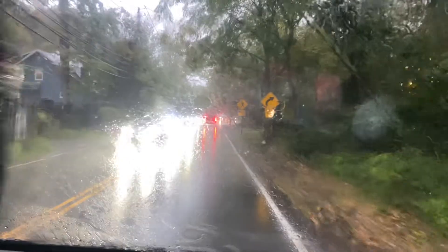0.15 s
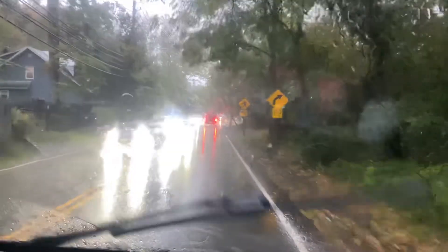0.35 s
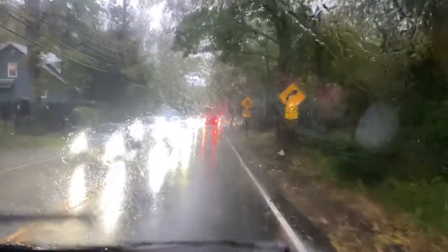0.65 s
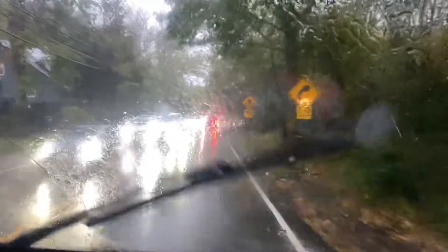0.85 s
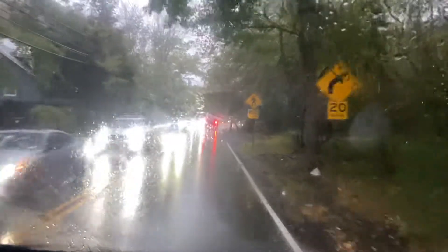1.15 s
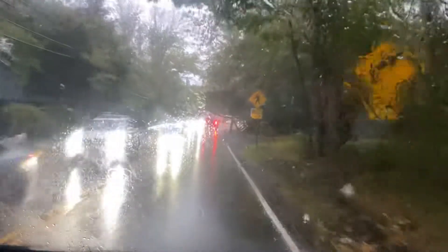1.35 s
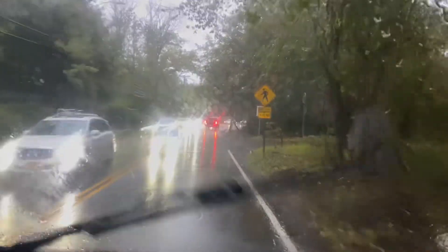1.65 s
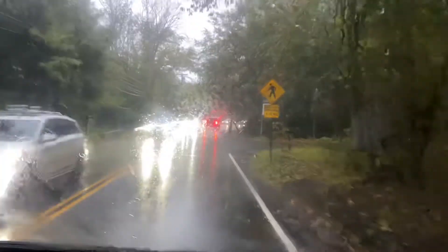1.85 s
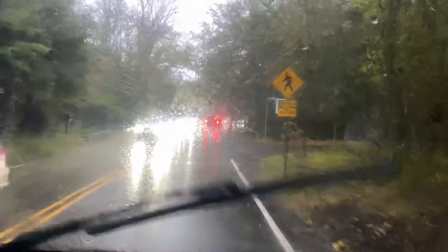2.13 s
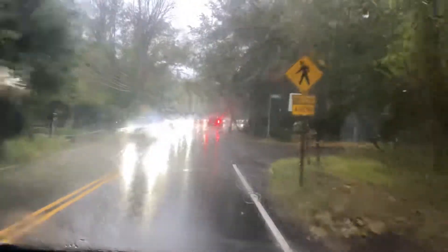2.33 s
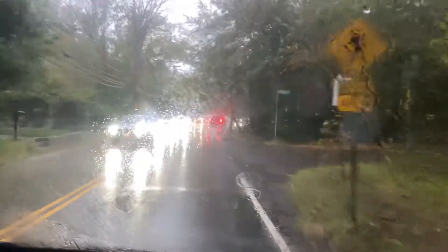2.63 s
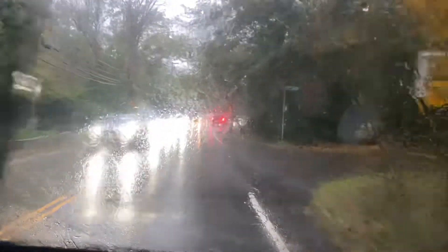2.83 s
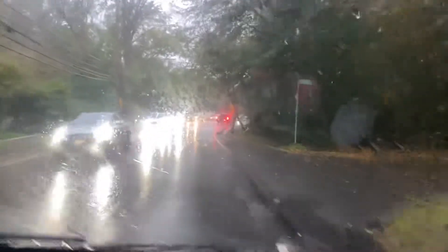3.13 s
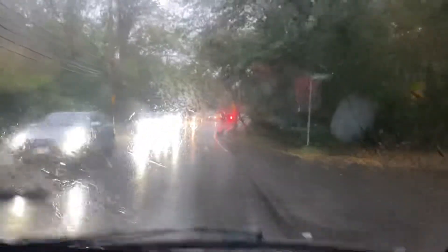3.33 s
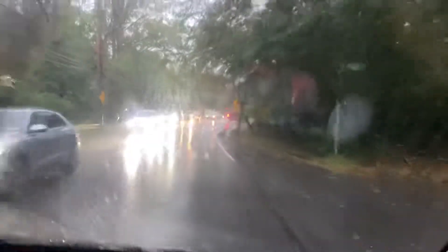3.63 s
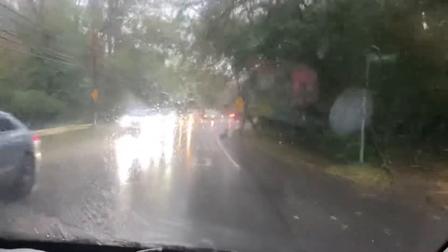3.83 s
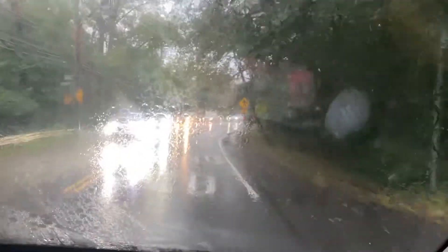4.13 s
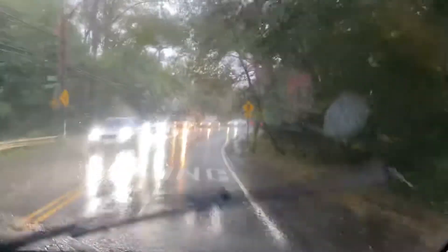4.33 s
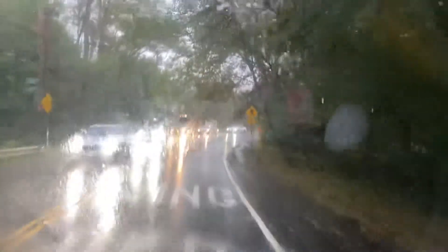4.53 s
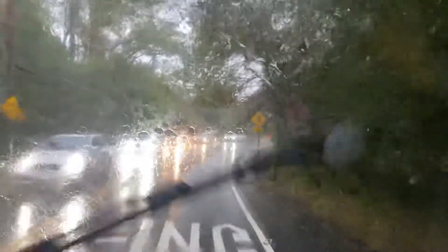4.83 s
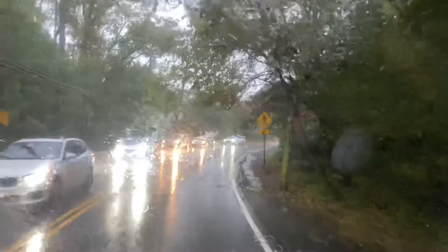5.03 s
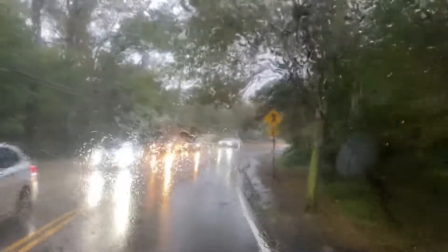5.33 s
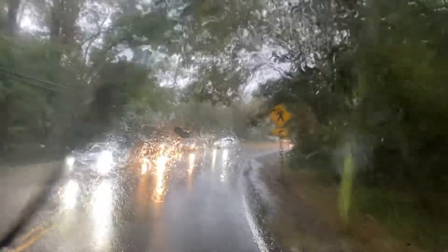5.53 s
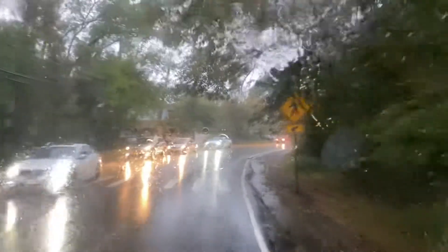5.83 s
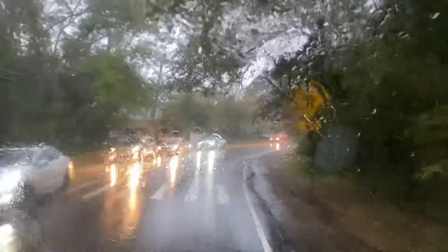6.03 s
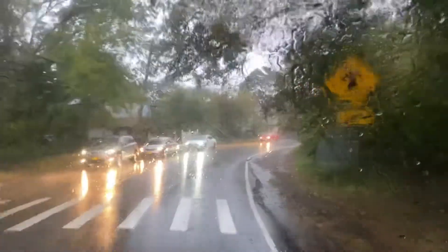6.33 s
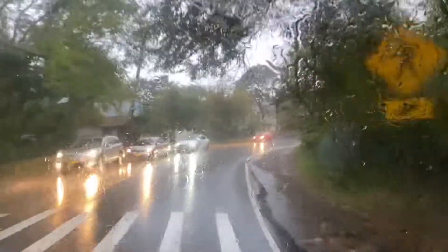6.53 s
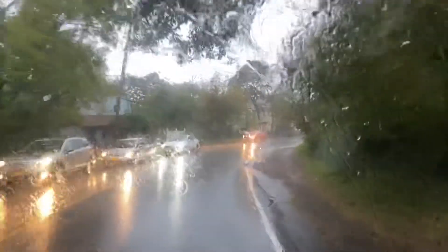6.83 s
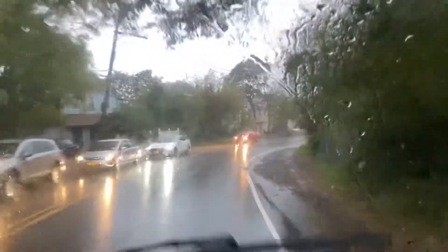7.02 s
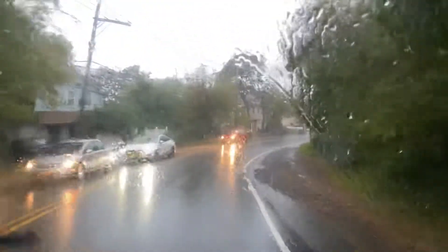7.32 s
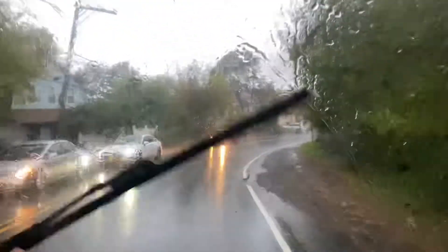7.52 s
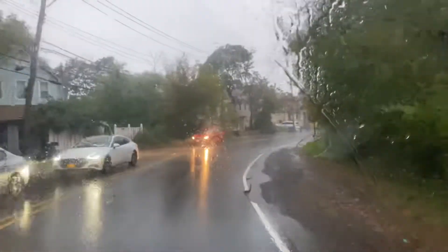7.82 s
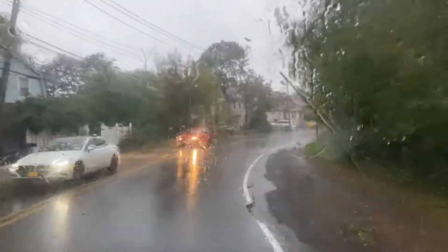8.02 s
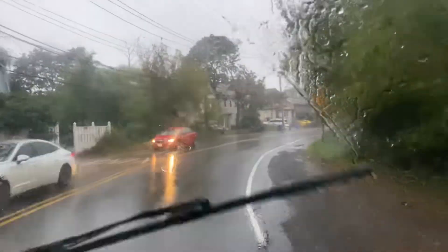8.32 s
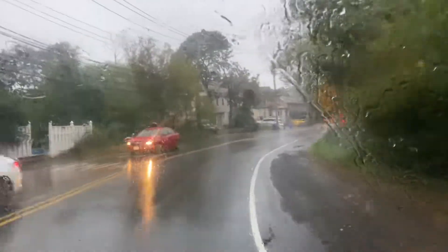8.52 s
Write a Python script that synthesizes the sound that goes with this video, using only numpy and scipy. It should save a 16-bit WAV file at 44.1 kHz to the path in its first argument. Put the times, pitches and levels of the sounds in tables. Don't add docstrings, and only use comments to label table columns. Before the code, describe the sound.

Heard from inside a closed car on a wet road: a deep, uneven road rumble with bumps, steady fine rain hiss, and soft wiper thumps about every two thirds of a second. After one second big drops crack and splatter on glass and roof. A bump past three seconds makes loose metal clink faintly; drops thin, then return heavily after five seconds. Close stereo cabin microphone, brighter on the left.

```python
import sys
import numpy as np
from scipy import signal
from scipy.fft import rfft, irfft, next_fast_len
from scipy.io import wavfile
from scipy.ndimage import uniform_filter1d

SR = 44100
rng = np.random.default_rng(int(sys.argv[2]) if len(sys.argv) > 2 else 0)


def output_pcm(signal):
    pcm = np.clip(np.atleast_2d(signal).T, -1, 1) * 32767
    wavfile.write(sys.argv[1], SR, np.round(pcm).astype(np.int16))


def linear_from_db(decibels):
    return 10 ** (np.asarray(decibels, float) / 20)


N = 382347


def rms_one(x):
    return x / np.sqrt(np.mean(x ** 2) + 1e-20)


def in_time(rows):
    s, *columns = np.transpose(rows)
    return [np.interp(np.arange(N) / SR, s, c) for c in columns]


def at_hz(points, hz):
    table = np.array(points)
    return np.interp(np.log(hz), np.log(table[:, 0]), table[:, 1])


def drift(rate):
    r = np.exp(-80 * np.pi * rate / SR)
    slow = signal.lfilter([1], [1, -2 * r, r * r], rng.standard_normal(N // 40 + 2002))[2000:]
    return np.interp(np.arange(N) / 40, np.arange(len(slow)), rms_one(slow))


def noise():
    return rng.standard_normal((2, N))


def spectrum_bins():
    size = next_fast_len(N + 4096)
    return size, np.maximum(np.arange(size // 2 + 1) * SR / size, 1)


def coloured(spectrum, x):
    size, hz = spectrum_bins()
    return irfft(rfft(x, size) * linear_from_db(at_hz(spectrum, hz)), size)[:, :N]


def band(x, low_hz, high_hz, order=2):
    return signal.sosfilt(signal.butter(order, [low_hz, high_hz], "band", fs=SR, output="sos"), x)


def fade(power, t60):
    return signal.lfilter([1], [1, -linear_from_db(-120 / (t60 * SR))], power + 1e-18)


def smear(power, rise_s):
    r = np.exp(-1 / (rise_s * SR))
    return signal.lfilter([1 - r], [1, -r], power + 1e-18)


def even(x, span_s):
    power = uniform_filter1d(np.mean(x ** 2, axis=0), int(span_s * SR))
    return rms_one(x / np.sqrt(power + 1e-12))


# (time [s], cabin boom [dB], suspension heave [dB], length [s])
LOW_SWELLS = [(0.0, -14.5, -47, 0.022), (0.8, -28, -44, 0.22), (1.104, -23.5, -40, 0.067),
              (1.342, -17, -43, 0.047), (1.935, -20.5, -32, 0.11), (2.653, -17.5, -47, 0.12),
              (3.432, -18.5, -19, 0.1), (3.836, -45, -18, 0.12), (3.966, -12, -38, 0.064),
              (4.87, -13.5, -30, 0.061), (5.315, -18.5, -45, 0.051), (5.5, -20.5, -39, 0.026),
              (5.8, -22.5, -30, 0.12), (6.207, -22, -23.5, 0.11), (6.673, -15, -22, 0.056),
              (6.962, -14, -22, 0.035), (7.43, -28, -38, 0.43), (7.613, -15.5, -43, 0.047),
              (7.71, -14, -28, 0.021), (7.99, -17, -45, 0.063), (8.2, -35, -34, 0.066),
              (8.417, -23.5, -43, 0.11)]


def low_swells():
    t = np.arange(0, N, 64) / SR
    s, boom_db, heave_db, length_s = np.transpose(LOW_SWELLS)[:, :, None]
    side_s = length_s * np.where(t < s, 0.68, 1)
    swell = np.exp(-2 * np.abs(t - s) / side_s)
    powers = [np.sum(linear_from_db(2 * db) * swell, axis=0) for db in (boom_db, heave_db)]
    return [np.interp(np.arange(N) / SR, t, power) for power in powers]


# (time [s], level [dB])
SURFACE = [
    (0, -30.5),
    (1.3, -29.5),
    (2.2, -29),
    (3.0, -31.5),
    (3.4, -28),
    (4.5, -31),
    (6.4, -28),
    (8.0, -28.5),
    (8.67, -29),
]
# (frequency [Hz], density [dB per Hz])
HEAVE = [(12, -34), (25, -4), (33, 8.5), (40, 2), (52, 13.5), (65, -22), (90, -83)]
# (frequency [Hz], density [dB per Hz])
BOOM = [(15, -30), (45, -14), (62, 8), (75, 12), (90, 6), (105, -5), (140, -51.5)]
# (frequency [Hz], width [Hz], level [dB])
CABIN = [(119.4, 17.2, 2.5), (145.5, 29.5, -3.5), (188.7, 23.7, -7.5), (247.4, 23.4, -8),
         (300.3, 24.8, -5.5), (542.6, 39, -17.5), (655, 160, -22.5)]


def road():
    (drone_db,) = in_time(SURFACE)
    boom_power, heave_power = low_swells()
    heave = np.sqrt(linear_from_db(2 * (drone_db - 7.5)) + heave_power)
    boom = np.sqrt(linear_from_db(2 * (drone_db + 1.5)) + boom_power)
    white, drone = noise(), 0
    for k, (hz, width_hz, level_db) in enumerate(CABIN):
        r = np.exp(-np.pi * width_hz / SR)
        numerator = [(1 - r * r) / 2, 0, (r * r - 1) / 2]
        denominator = [1, -2 * r * np.cos(2 * np.pi * hz / SR), r * r]
        ringing = signal.lfilter(numerator, denominator, white)
        drone = drone + (-1) ** k * linear_from_db(level_db + 1.68 * drift(3.9)) * ringing
    low = heave * even(coloured(HEAVE, noise()), 1.0) + boom * even(coloured(BOOM, noise()), 0.26)
    return low + linear_from_db(drone_db) * rms_one(drone)


# (time [s], level [dB])
RAINFALL = [
    (0, -41.5),
    (1.0, -41),
    (2.8, -41.5),
    (3.7, -39),
    (5.2, -39.5),
    (5.36, -43.5),
    (7.4, -39.5),
    (8.3, -39.5),
    (8.67, -38),
]
# (time [s], level [dB])
CANOPY = [(0.93, -45.5), (1.02, -33), (1.35, -32.5), (1.55, -43), (2.2, -33.5), (2.7, -30), (2.95, -40.5),
          (3.3, -40.5), (4.2, -43.5), (5.25, -41.5), (5.45, -61.5), (5.96, -28), (6.3, -45), (6.6, -27),
          (7.1, -44.5), (7.98, -32), (8.15, -45), (8.67, -45)]
# (frequency [Hz], density [dB per Hz])
FINE = [(590, -18), (1000, -8.5), (1270, 3.5), (1460, -1.5), (2170, -1), (2350, 2), (4370, -4.5),
        (6590, -11.5), (8220, -13), (9850, -9.5), (11000, -14), (16000, -8)]
# (frequency [Hz], density [dB per Hz])
ROOF = [(190, -82), (330, -6.5), (452, -6.5), (628, 2.5), (744, -4), (952, -4), (2500, -13.5),
        (3250, -15.5), (5500, -120)]


def fine_rain(level_db, roof_db, per_s=5000):
    sizes_db = 3.4 * np.minimum(rng.exponential(1, (2, N)), 5)
    grains = (rng.random((2, N)) < per_s / SR) * linear_from_db(sizes_db) * noise()
    hiss = rms_one(coloured(FINE, rms_one(grains) + 1.16 * noise()))
    drumming = rms_one(coloured(ROOF, noise()))
    hiss_gain = linear_from_db(level_db + 0.7 * drift(12))
    roof_gain = linear_from_db(roof_db + 1.0 + 2.1 * drift(46))
    return hiss_gain * hiss + roof_gain * drumming


# (time [s], peak
# [dB], patch frequency [Hz])
PINGS = [(-0.0004, -33, 9500), (0.8188, -30, 4400), (0.9542, -42, 2200), (0.9874, -26, 1000),
         (1.0111, -18, 3280), (1.0627, -34, 6300), (1.0867, -42, 9500), (1.2765, -22, 1000),
         (1.3164, -25, 1500), (1.3441, -20, 6300), (1.3745, -38, 9500), (1.3937, -21, 4500),
         (1.4217, -42, 9500), (1.4499, -19, 4500), (1.4775, -26, 1000), (1.5653, -34, 9500),
         (1.6053, -33, 9500), (1.6596, -30, 6300), (1.7088, -36, 9500), (1.7409, -15.5, 4500),
         (1.7514, -29, 9500), (1.7923, -21, 3180), (1.815, -32, 6300), (1.8696, -26, 2200),
         (1.924, -28, 4500), (1.9265, -30, 1000), (1.95, -30, 9500), (2.0009, -24, 1500),
         (2.1036, -21, 1000), (2.1089, -28, 1500), (2.1587, -27, 4500), (2.2258, -26, 1000),
         (2.2445, -33, 1500), (2.3189, -36, 1500), (2.3343, -21, 3200), (2.3892, -39, 9500),
         (2.5112, -35, 9500), (2.5132, -26, 2200), (2.5708, -29, 2200), (2.6162, -15, 4500),
         (2.6439, -37, 2200), (2.7327, -25, 2200), (2.8205, -32, 6300), (2.8759, -25, 1000),
         (2.9572, -23, 3200), (3.0654, -23.5, 4530), (3.1211, -30, 2200), (3.157, -23, 1000),
         (3.2503, -25, 1500), (3.3119, -27, 1500), (4.149, -40, 1000), (4.2966, -32, 2200),
         (4.3874, -34, 2200), (5.0993, -30, 2200), (5.1926, -23, 1500), (5.2305, -23, 3200),
         (5.3203, -35, 9500), (5.3218, -30, 1000), (5.3582, -30, 1000), (5.4079, -27, 4500),
         (5.4408, -17, 4500), (5.442, -34, 1000), (5.4605, -24, 6300), (5.4812, -18, 970),
              (5.4894, -25, 2200), (5.5079, -13.5, 4500), (5.5102, -25, 985), (5.5435, -20, 2200),
              (5.6912, -28, 4500), (5.8157, -29, 4500), (5.8301, -29, 4500), (5.851, -23, 4470),
              (5.8718, -24, 9200), (5.9605, -32, 1000), (6.034, -18, 4470), (6.0631, -32, 6300),
              (6.211, -22, 4500), (6.3579, -23, 2200), (6.3836, -22, 3200), (6.4103, -24, 3180),
              (6.4293, -34, 9500), (6.491, -26, 9500), (6.5145, -29, 1000), (6.5745, -23, 1000),
              (6.6677, -36, 6300), (6.7047, -40, 9500), (6.7426, -38, 6300), (6.7723, -27, 3200),
              (6.7989, -25, 1000), (6.8294, -42, 9500), (6.866, -24, 9500), (6.8803, -30, 1500),
              (6.9127, -29, 2200), (6.9129, -32, 9500), (6.992, -28, 9500), (7.118, -27, 1500),
              (7.2913, -32, 9500), (7.3088, -30, 2220), (7.3415, -17, 9600), (7.343, -13, 3220),
              (7.3889, -38, 9500), (7.457, -19, 4500), (7.4976, -26, 9500), (7.55, -18, 4480),
              (7.5889, -39, 6300), (7.5965, -20, 4500), (7.6802, -41, 9500), (7.7006, -21, 2200),
              (7.7847, -36, 9500), (7.8184, -14, 4370), (7.8286, -27, 6300), (7.8299, -25, 2200),
              (7.8473, -29, 9500), (7.855, -21, 4500), (7.8585, -22, 1000), (7.9924, -21, 1000),
              (8.1279, -28, 3200), (8.59, -31, 9570), (8.6612, -22, 6300), (8.6615, -24, 2180)]


def pings(cycles=9.3, level_db=4.5, rough=0.64):
    out, t = np.zeros((2, N + 1024)), np.arange(1024) / SR
    rows = PINGS
    for (s, peak_db, hz), chance in zip(rows, rng.standard_normal((len(rows), 2, 1024))):
        wobble = rough * np.cumsum(chance, axis=1) * np.sqrt(hz / SR)
        phase = 2 * np.pi * hz * t + wobble
        decay_db = 60 * t * hz / (cycles * (hz / 1000) ** 0.36)
        gain = linear_from_db(peak_db + level_db - at_hz(BALANCE_DB, hz) / 3.1 - decay_db)
        onset = 1 - np.exp(-4 * t * hz)
        start = int(abs(s) * SR)
        out[:, start:start + 1024] += gain * onset * np.sin(phase)
    return out[:, :N]


# (time [s], peak [dB], splash brightness [dB])
GLASS_TICKS = [(0.9867, -22, 0), (1.344, -22, 6), (1.45, -19.5, 2), (1.565, -23, 3), (1.7413, -19, -2),
               (1.967, -24, 3), (2.075, -18, 1), (2.282, -21, -9), (2.51, -25, 4), (2.6152, -19.5, 2),
               (5.228, -29, 10), (5.5077, -16.5, 8.5), (5.585, -19.5, -3), (5.708, -23, -3),
               (5.8044, -19, 5), (5.8503, -26, -4), (5.8707, -23, 5), (6.0312, -24.5, 7), (6.1772, -28, 11),
               (6.491, -20.5, 0), (6.77, -27, 5), (7.263, -16, 2), (7.291, -20.5, 9), (7.341, -14.5, -2),
               (7.401, -21, 0), (7.425, -23.5, 10.5), (7.532, -27, 5), (7.593, -17, -26), (7.819, -21, 7),
               (8.5921, -17, 3)]
# (time [s], peak [dB], splash brightness [dB])
SPLATTERS = [(1.011, -24.5, -17), (1.299, -20.5, 0), (1.375, -19, -2), (1.61, -19, -12), (1.665, -22.5, 0),
             (1.827, -23.5, -15), (1.8578, -21.5, 5), (1.9977, -21, -18), (2.049, -24, 1), (2.34, -17, 1),
             (2.4119, -28, -5), (2.72, -18.5, -1), (2.818, -25, -5), (5.44, -19.5, 4), (5.569, -20.5, -2),
             (5.5952, -17, 2), (5.6206, -20, 1), (5.6454, -17.5, 2), (5.828, -20.5, 8), (5.978, -22, -5),
             (6.275, -21, 0), (6.326, -24, 4), (6.3484, -21.5, -8), (6.7405, -18, -7), (7.478, -21.5, 7),
             (7.493, -20, 6), (7.548, -22, -10), (7.628, -20.5, -2), (7.827, -15.5, 4), (8.411, -23, -10)]
# (time [s], peak [dB], splash
# brightness [dB])
ROOF_THUDS = [(1.137, -22, -2), (1.329, -23, -19), (1.419, -25.5, -3), (1.476, -26, -21), (1.225, -24, 1),
              (2.2654, -26, -7), (2.4285, -22, 2), (2.8415, -24.5, 3), (2.958, -24.5, -1), (3.182, -27, 10),
              (3.3635, -24, 1), (3.393, -34, -14), (5.3517, -26.5, -22), (5.4723, -28, 1), (5.5194, -30, 3),
              (5.743, -24, 2), (5.7673, -24.5, 2), (6.009, -23.5, 8), (6.372, -23.5, 4), (6.6666, -26, -15),
              (6.8032, -22, 2), (6.8588, -20, 2), (6.9116, -23.5, 5), (7.3766, -25.5, -2),
              (7.699, -22.5, -20), (7.756, -23, -17), (7.858, -21.5, 12), (7.918, -24, 3),
              (8.4776, -26.5, -2), (8.5195, -25.5, 4)]
# (time [s], peak [dB], splash brightness [dB])
FAINT_TICKS = [(1.0645, -30, -7), (1.174, -21.5, 1), (1.5252, -26.5, -4), (1.792, -26.5, -16),
               (2.3181, -35, -1), (2.5701, -36, -4), (3.117, -29, -7), (3.161, -23, -3), (5.3187, -30, 5),
               (5.4071, -33, 5), (5.457, -33, 19), (5.5452, -25.5, -5), (5.615, -26, 5), (5.967, -28, -7),
               (6.211, -44, 5), (6.466, -23, -6), (6.548, -24.5, 6), (7.003, -25, 6), (7.214, -26, -4),
               (7.457, -27.5, -7), (7.6395, -24, -14), (8.001, -28, -12), (8.4248, -41, -10),
               (5.479, -25.5, -8), (3.462, -23.5, -1), (7.901, -24, 10), (1.707, -21, 0), (2.446, -45, -12),
               (5.098, -27.5, 3), (1.102, -33, -2)]
# (low thud [dB], splatter share [0-1])
LANDING = [
    (-2, 0.2),
    (-2, 0.72),
    (5, 0.7),
    (4, 0.6),
]
# (frequency [Hz], density [dB per Hz])
DROP = [(240, -10), (400, 2), (466, -8.5), (641, 0), (706, -6), (823, 0.5), (1150, -4.5), (2460, -4.5),
        (2710, -3.5), (4660, -9.5), (8000, -18), (9840, -17), (11000, -23.5), (16000, -36)]
# (frequency [Hz], decay time t60 [s])
TAIL = [(500, 0.046), (1300, 0.21), (3500, 0.11), (9000, 0.061)]


def drops(per_s, middling_db=-42, crack_t60=0.026, tail_db=-9, spread_s=0.0048, snap_db=8, splash_snap_db=4.0,
          droplets_per_s=280):
    places = zip((GLASS_TICKS, SPLATTERS, ROOF_THUDS, FAINT_TICKS), LANDING)
    landed = [row + kind for rows, kind in places for row in rows]
    s, peak_db, splash_db, thud_db, soft = np.transpose(landed)
    at, soft = (s * SR).astype(int), np.clip(soft, 0, 1)
    born = rng.random(N) < per_s * linear_from_db(3.0 * drift(8)) / SR
    big = np.zeros(N)
    big[at] = 1
    born &= uniform_filter1d(big, size=800, origin=-400) < 1e-6
    sizes_db = 2.6 * np.minimum(rng.exponential(1, N), 1.8)
    middling = born * linear_from_db(2 * (middling_db + sizes_db))
    droplets = (rng.random(N) < droplets_per_s / SR) * rng.exponential(SR / droplets_per_s, N)
    out, white = 0, (noise(), noise())
    edges = 400 * 2 ** np.arange(0, 5.6, 1 / 2)
    for k, (low, high) in enumerate(zip(edges, edges[1:])):
        hz = np.sqrt(low * high)
        dull = np.clip(np.log2(2500 / hz), 0, 1)
        bright = np.clip(np.log2(hz / 5500), 0, 1.8)
        colour_db = dull * thud_db + bright * splash_db
        strength = linear_from_db(2 * (peak_db + 2.5 + colour_db + 1.85 * rng.standard_normal(len(at))))
        sharp, splatter = middling * linear_from_db(2 * 4.9 * drift(29)), np.zeros(N)
        sharp[at] = strength * (1 - soft)
        splatter[at] = 0.84 * strength * soft
        splatter = smear(smear(splatter, spread_s), spread_s)
        sharp = sharp + 0.5 * splatter * droplets
        power = smear(sharp, 12.0 / hz) + 0.5 * splatter
        snap = linear_from_db(2 * (snap_db + splash_snap_db * bright)) * fade(smear(sharp, 1.0 / hz), 10.3 / hz)
        crack = fade(power, crack_t60 * np.sqrt(4000 / hz))
        tail = linear_from_db(2 * tail_db) * fade(power, at_hz(TAIL, hz))
        out = out + band(np.sqrt(snap + crack + tail) * white[k % 2], low, high)
    return coloured(DROP, out) / linear_from_db(at_hz(DROP, 2840))


# (time [s], peak [dB], upper knock against the peak [dB])
WIPER = [(0.038, -9, -13), (0.627, -10, -8), (1.299, -5, -29), (1.979, -29, -14), (2.64, -8, -27),
         (3.358, -11, -23), (3.969, -10, -19), (4.619, -15.5, -1), (5.3, -7, -5), (5.946, -15, 4),
         (6.639, -7.5, -11), (7.31, -10.5, -1), (7.97, -8, -23), (8.599, -24, 17)]


def wipers(rise_s=0.0375, t60=0.24):
    s, peak_db, knock_db = np.transpose(WIPER)
    start = (np.maximum(s - rise_s, 0) * SR).astype(int)
    shudder, knock = (80.0, 178, peak_db - 10.0), (215, 327, peak_db + knock_db - 18.0)
    out = 0
    for low_hz, high_hz, level_db in (shudder, knock):
        power = np.zeros(N)
        power[start] = linear_from_db(2 * level_db)
        shape = np.sqrt(smear(fade(power, t60), rise_s))
        out = out + shape * even(band(noise(), low_hz, high_hz), 0.068)
    return out


def lulls(length_s=0.018, depth_db=-3):
    t, s = np.arange(0, N, 32) / SR, np.array(GLASS_TICKS)[:, :1]
    half_s = 0.5 * length_s
    before = np.exp(-((t - s + half_s) / half_s) ** 2).max(axis=0)
    return np.interp(np.arange(N) / SR, t, depth_db * before)


# (time [s], peak [dB])
SPRAY = [(0.9861, -49), (1.1383, -54), (1.3009, -46), (1.345, -42), (1.3792, -49), (1.4576, -55),
         (1.4581, -53), (1.564, -44), (1.6042, -50), (1.6616, -58), (1.8572, -54), (1.927, -54),
         (1.9489, -54), (1.9664, -51), (2.0338, -60), (2.0497, -53), (2.0801, -47), (2.5106, -45),
         (2.6149, -48), (2.8389, -56), (2.9567, -58), (5.3193, -49), (5.4395, -55), (5.4565, -44),
         (5.4799, -50), (5.5074, -48), (5.5707, -46), (5.615, -37), (5.8052, -42), (5.8266, -45),
         (5.8496, -50), (5.8705, -53), (6.0337, -48), (6.1758, -56), (6.2088, -52), (6.2861, -44),
         (6.4507, -51), (6.4896, -50), (6.7036, -53), (6.8054, -54), (6.865, -42), (7.2635, -38),
         (7.2903, -50), (7.3407, -44), (7.424, -46), (7.4799, -48), (7.4973, -43), (7.5323, -51),
         (7.5492, -47), (7.6226, -53), (7.8176, -41), (7.8465, -46), (7.9014, -46), (8.4118, -55),
         (8.5894, -52)]


def spray(low_hz=9000, level_db=14.0, t60=0.0067):
    s, peak_db = np.transpose(SPRAY)
    power = np.zeros(N)
    power[(s * SR).astype(int)] = linear_from_db(2 * (peak_db + level_db))
    burst = np.sqrt(fade(power, t60)) * noise()
    burst = signal.lfilter([1, -2, 1], [1], burst)
    return signal.sosfilt(signal.butter(4, low_hz, "high", fs=SR, output="sos"), burst)


# (time [s], level [dB], length [s])
SHUDDERS = [(1.22, -31, 0.16), (1.95, -31, 0.1), (2.19, -28.5, 0.12), (2.553, -29.5, 0.091),
            (2.743, -27, 0.16), (3.268, -28, 0.049), (3.453, -23.5, 0.075), (3.814, -30, 0.09),
            (4.106, -33, 0.24), (5.33, -28, 0.061), (6.825, -47, 0.11), (7.755, -38, 0.2)]


def shudders(low_hz=100, high_hz=158):
    t = np.arange(0, N, 64) / SR
    s, level_db, length_s = np.transpose(SHUDDERS)[:, :, None]
    power = np.sum(linear_from_db(2 * level_db) * np.exp(-((t - s) / length_s) ** 2), axis=0)
    pan = band(noise(), low_hz, high_hz, order=4)
    return np.sqrt(np.interp(np.arange(N) / SR, t, power)) * even(pan, 0.065)


# (time [s], level [dB])
RATTLE = [(3.33, -80), (3.35, -50), (3.392, -50), (3.402, -44), (3.428, -44), (3.44, -54), (3.462, -46),
          (3.47, -33), (3.479, -31), (3.49, -50), (3.52, -90)]
# (time [s], peak [dB])
CLINKS = [
    (3.397, -50),
    (3.42, -58),
    (3.456, -50),
    (3.474, -54),
]
# (frequency [Hz], level [dB], decay time t60 [s])
METAL = [
    (4940, 2, .05),
    (7000, -5, .06),
    (8800, 2, 0.088),
]


def clinks(rattle_hz=1865):
    level = linear_from_db(in_time(RATTLE)[0]) * linear_from_db(0.91 * drift(120))
    out = level * np.sin(2 * np.pi * rattle_hz * np.arange(N) / SR + 0.57 * drift(90))
    s, peak_db = np.transpose(CLINKS)
    for hz, level_db, t60 in METAL:
        touches = np.zeros(N)
        touches[np.round(s * SR).astype(int)] = linear_from_db(peak_db + level_db)
        r, w = linear_from_db(-60 / (t60 * SR)), 2 * np.pi * hz / SR
        out += signal.lfilter([0, np.sin(w)], [1, -2 * r * np.cos(w), r * r], touches + 1e-18)
    return out * [[1], [2.5]]


def scene():
    (fine_db,), (roof_db,) = in_time(RAINFALL), in_time(CANOPY)
    drops_per_s = 90 * linear_from_db(1.1 * (roof_db + 35.5))
    drumming_db = roof_db - 0.53 * (roof_db - roof_db.mean())
    rain = linear_from_db(lulls()) * fine_rain(fine_db, drumming_db)
    rain = rain + pings() + drops(drops_per_s) + spray()
    return road() + rain + wipers() + shudders() + clinks()


def band_limit(x):
    return signal.sosfilt(signal.butter(12, 15970, fs=SR, output="sos"), x)


# (frequency [Hz], likeness [0-1])
LIKENESS = [(60, 1), (150, 0.92), (220, 0.94), (350, 0.31), (650, 1), (950, 0.068), (1500, 0.31),
            (2100, 0.037), (2600, 0.32), (3500, 0.045), (4300, 0.42), (6800, 0.12), (8000, 0.3),
            (10000, 0.91), (14000, 0.55)]
# (frequency [Hz], left minus right [dB])
BALANCE_DB = [(60, -1), (140, -3), (210, -3.5), (330, 3.5), (500, 5), (770, 3.5), (1800, 3), (2700, 3),
              (3500, 15), (4600, 18.5), (6500, 16), (8200, 4), (9000, 1.5), (15000, -3)]
# (frequency [Hz], left lead [radians])
LEAD = [(0, 0), (600, 1.2), (1380, 4.0), (4310, 13.6), (5600, 10.8), (8000, np.pi), (16000, -3 * np.pi)]
# (frequency [Hz], gain [dB])
PORT = [(10, 2), (10800, -1.5), (11500, -3), (12300, -8), (13200, -12), (14200, -13.5), (15800, -26)]


def record(dry):
    size, hz = spectrum_bins()
    shared, own = rfft(dry, size)
    alike = np.clip(at_hz(LIKENESS, hz), 0, 1)
    lead = np.interp(hz, *np.transpose(LEAD))
    right = alike * np.exp(-1j * lead) * shared + np.sqrt(1 - alike ** 2) * own
    shade = linear_from_db(at_hz(BALANCE_DB, hz) / 2)
    ports = np.array([shared * shade, right / shade]) * linear_from_db(at_hz(PORT, hz))
    return band_limit(irfft(ports, size)[:, :N])


dry = scene()
out = record(dry)
output_pcm(out)
```